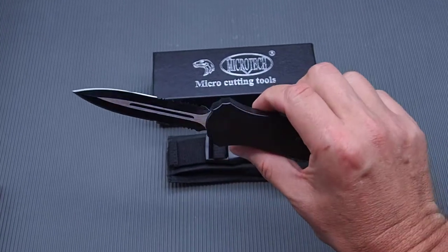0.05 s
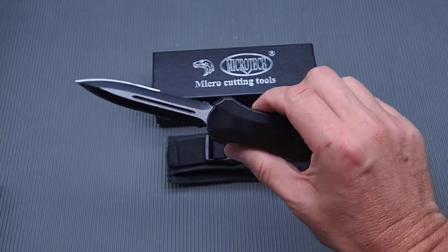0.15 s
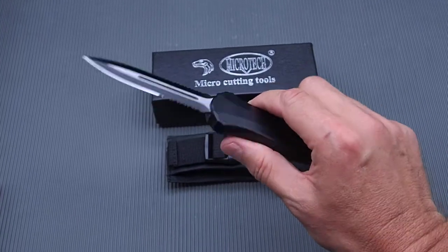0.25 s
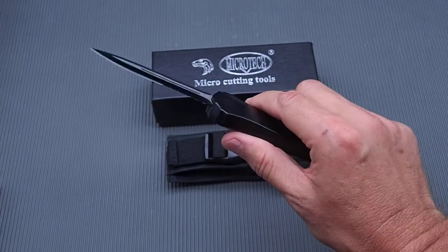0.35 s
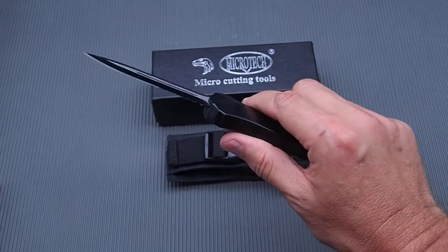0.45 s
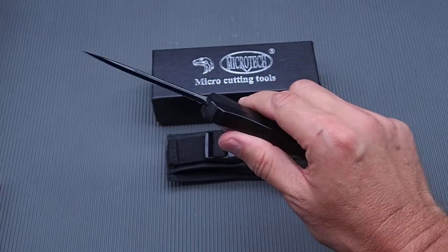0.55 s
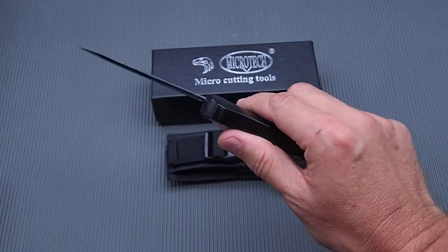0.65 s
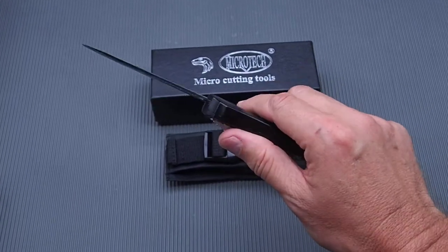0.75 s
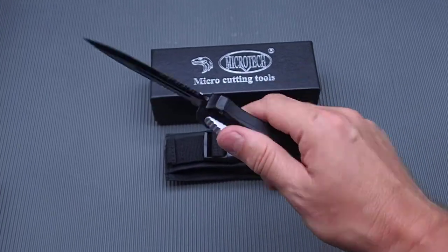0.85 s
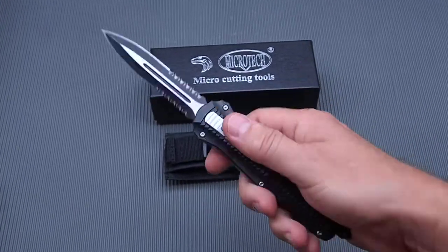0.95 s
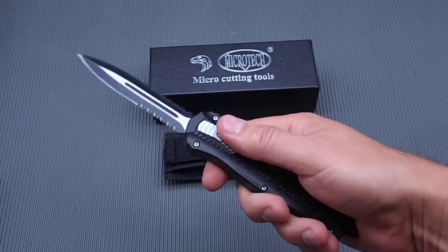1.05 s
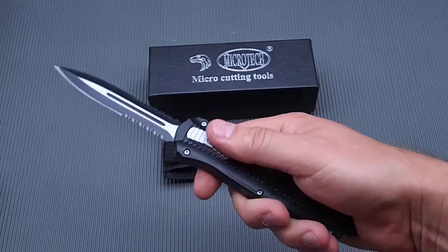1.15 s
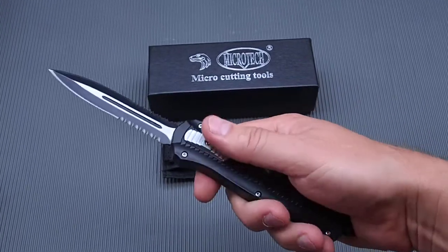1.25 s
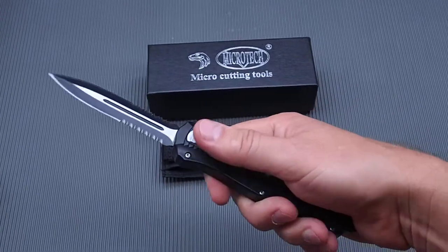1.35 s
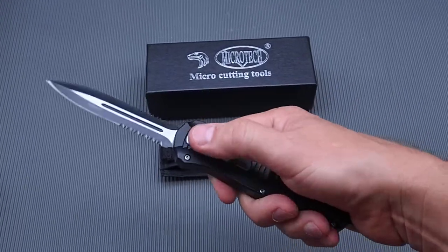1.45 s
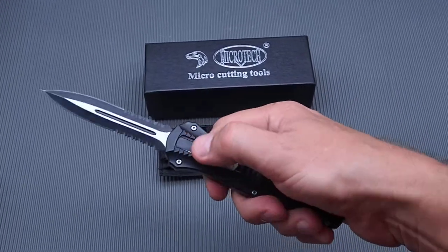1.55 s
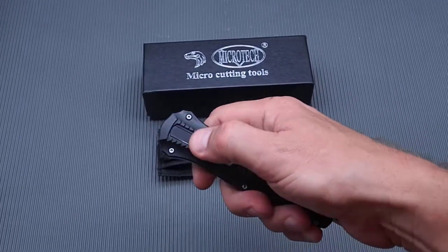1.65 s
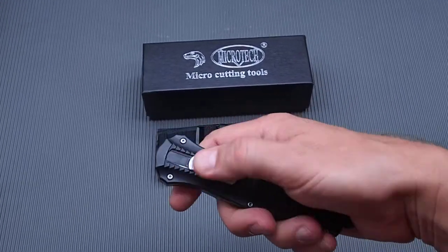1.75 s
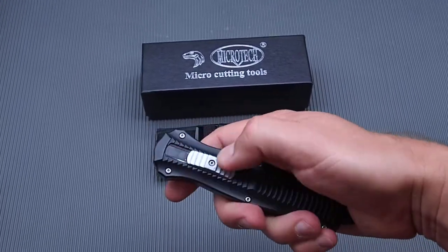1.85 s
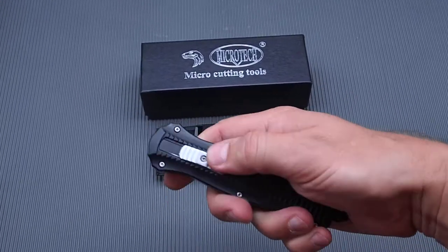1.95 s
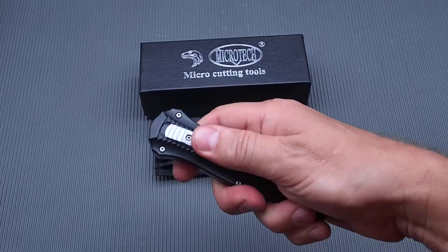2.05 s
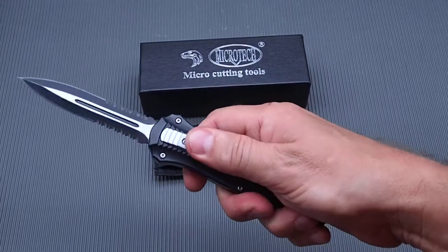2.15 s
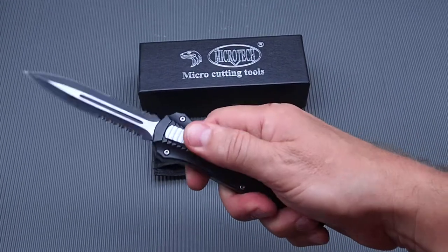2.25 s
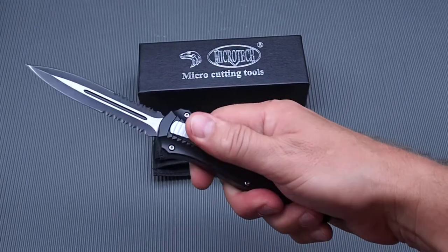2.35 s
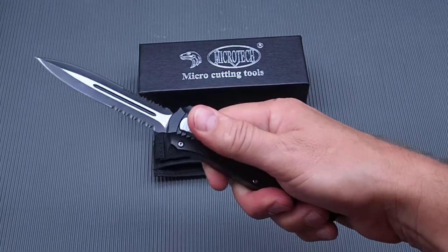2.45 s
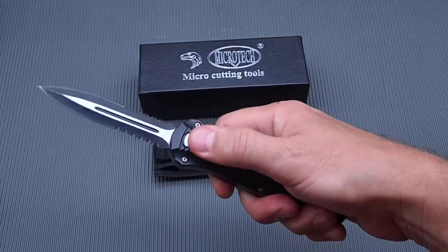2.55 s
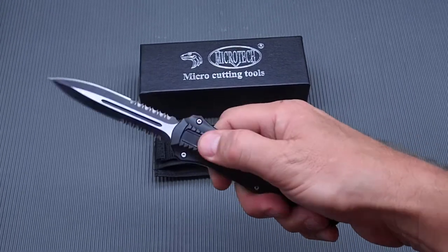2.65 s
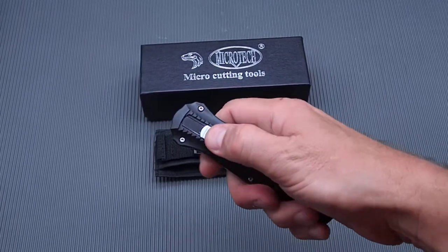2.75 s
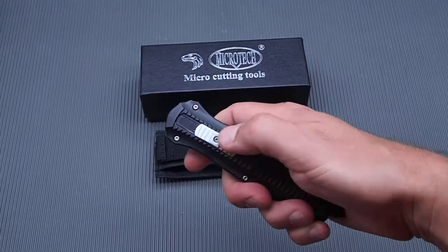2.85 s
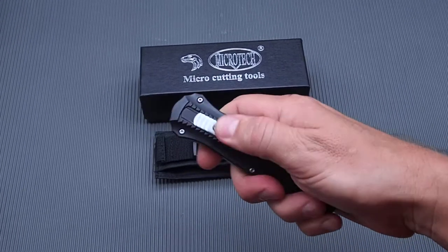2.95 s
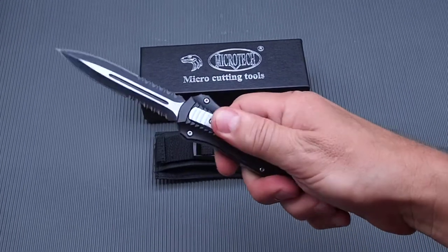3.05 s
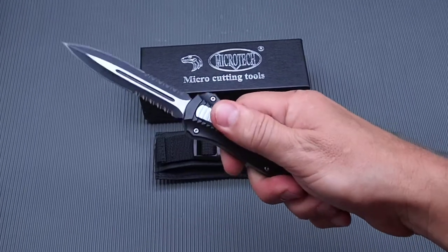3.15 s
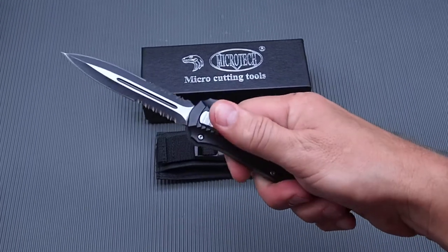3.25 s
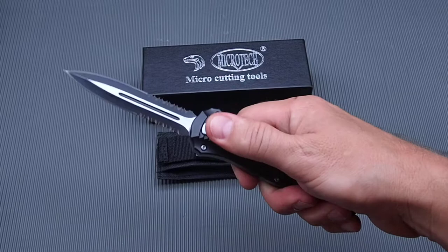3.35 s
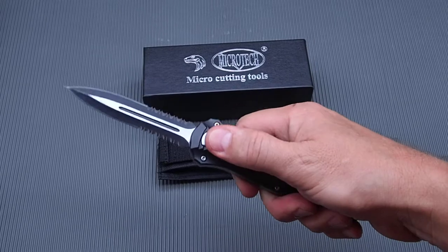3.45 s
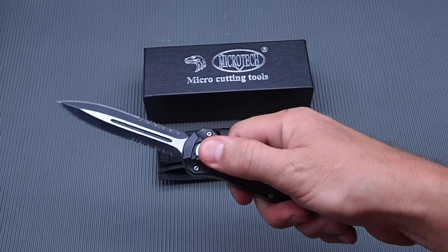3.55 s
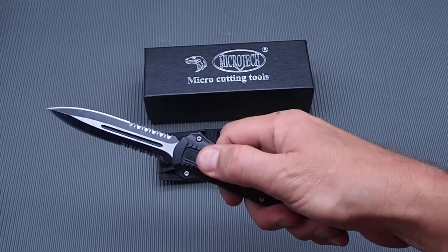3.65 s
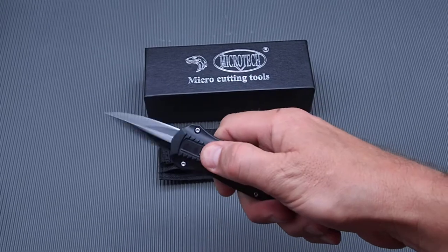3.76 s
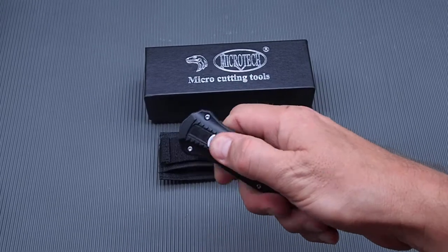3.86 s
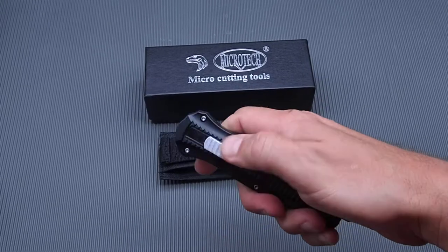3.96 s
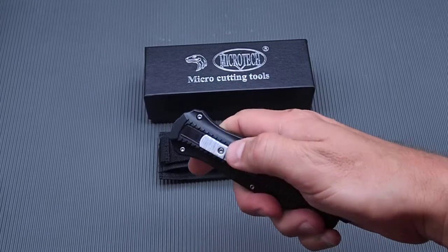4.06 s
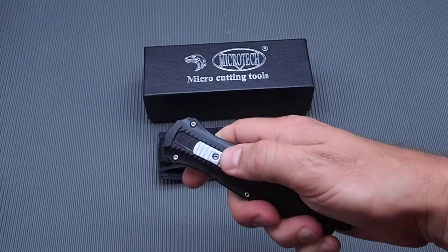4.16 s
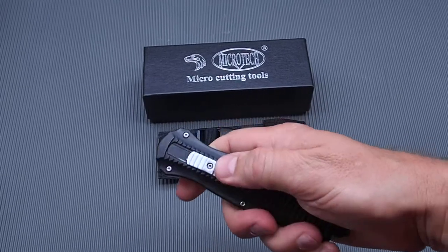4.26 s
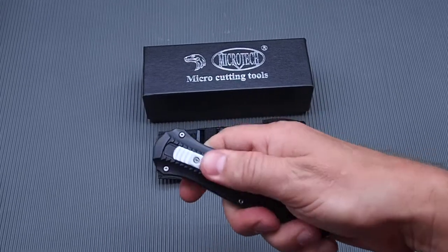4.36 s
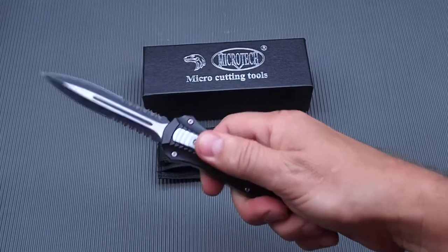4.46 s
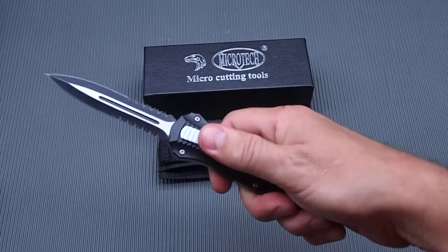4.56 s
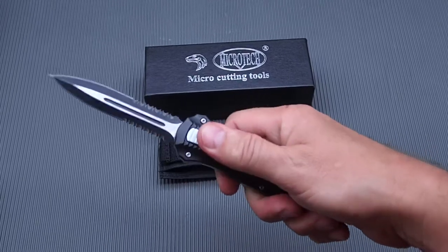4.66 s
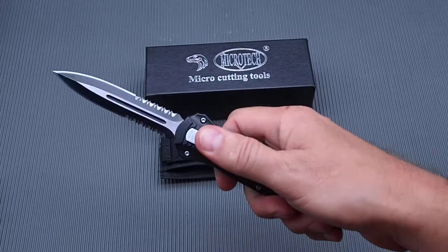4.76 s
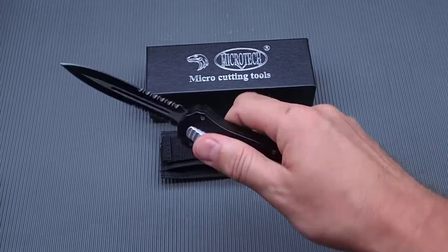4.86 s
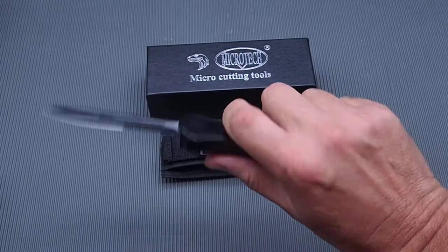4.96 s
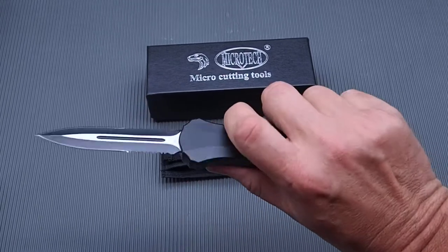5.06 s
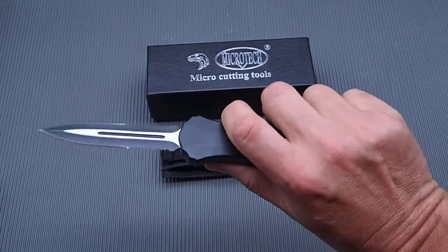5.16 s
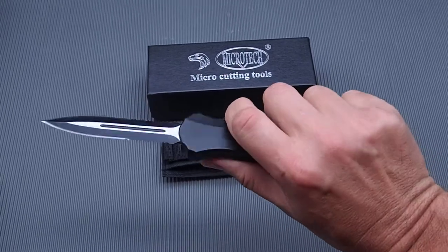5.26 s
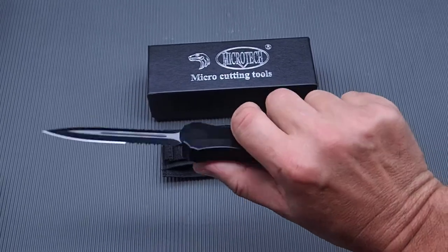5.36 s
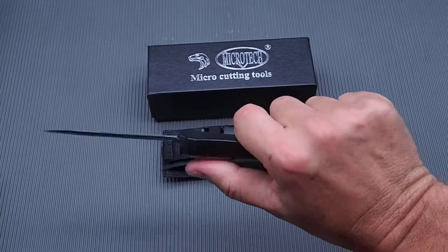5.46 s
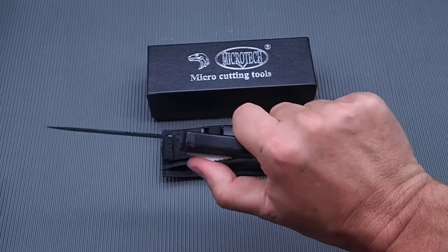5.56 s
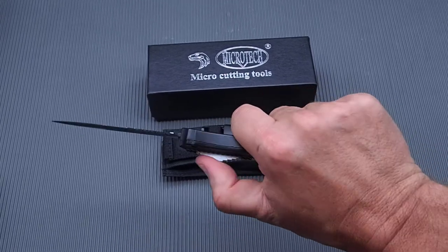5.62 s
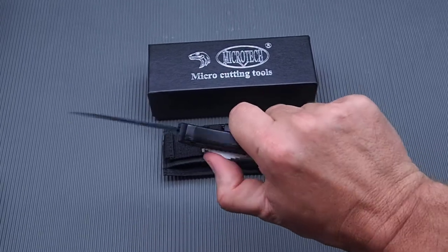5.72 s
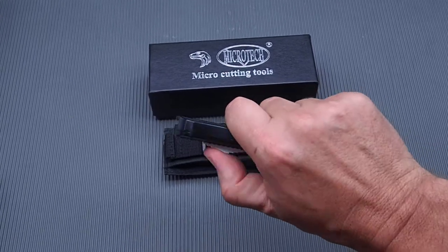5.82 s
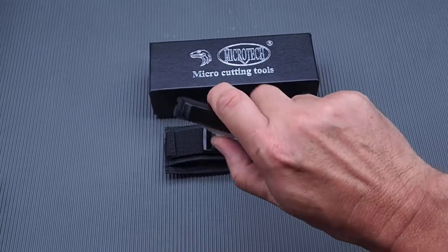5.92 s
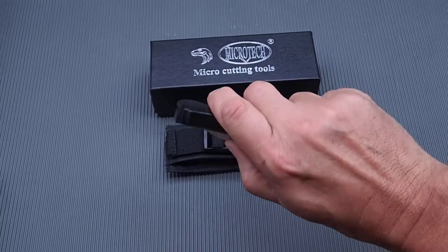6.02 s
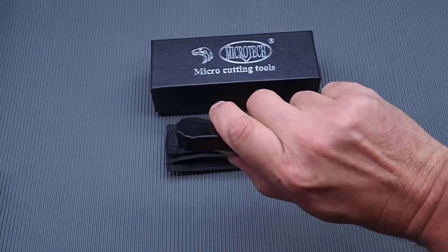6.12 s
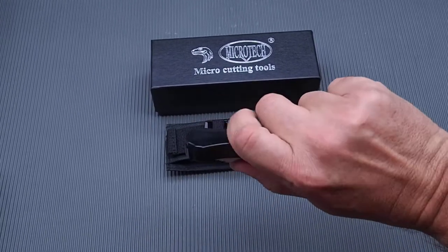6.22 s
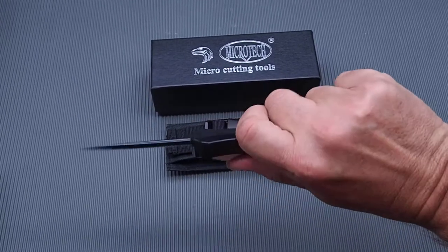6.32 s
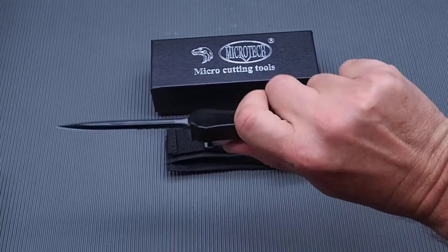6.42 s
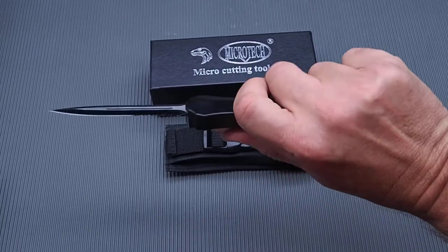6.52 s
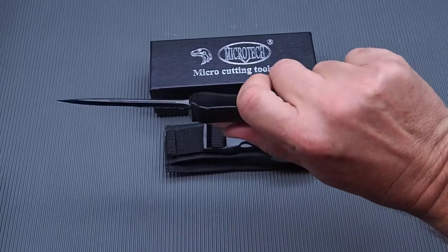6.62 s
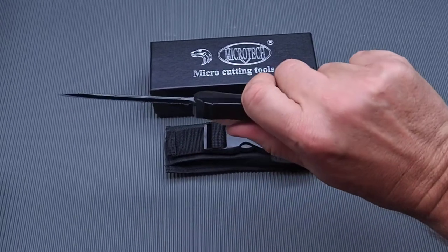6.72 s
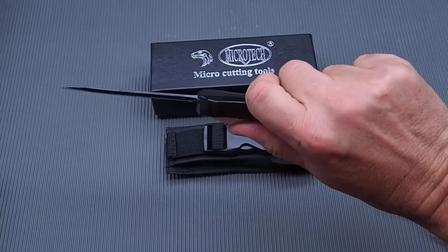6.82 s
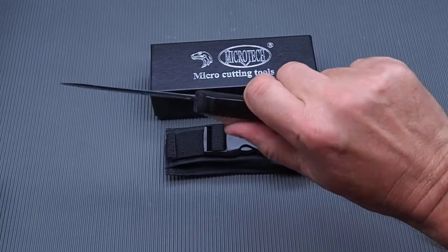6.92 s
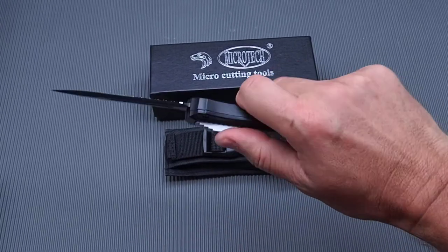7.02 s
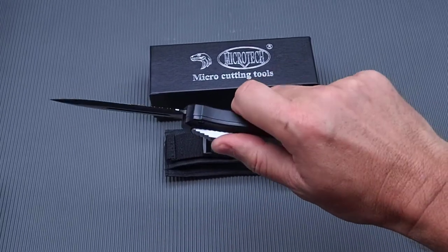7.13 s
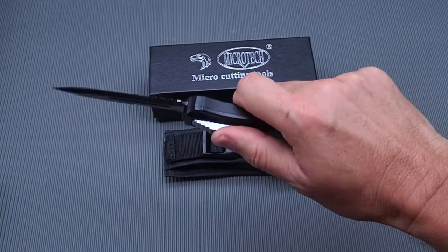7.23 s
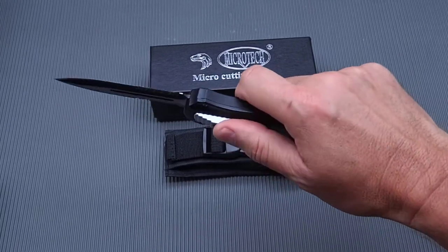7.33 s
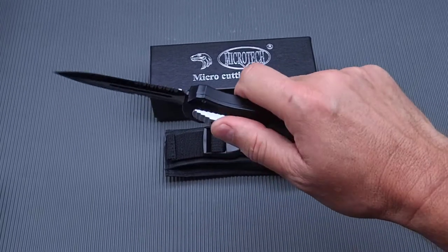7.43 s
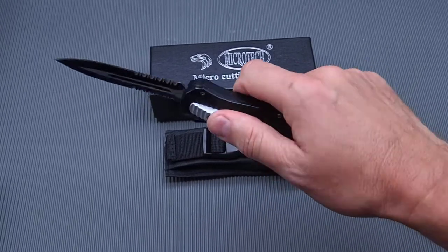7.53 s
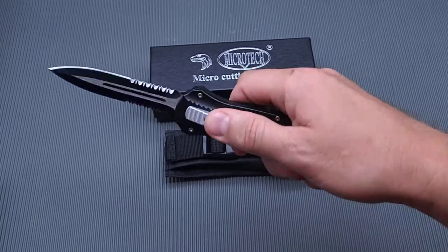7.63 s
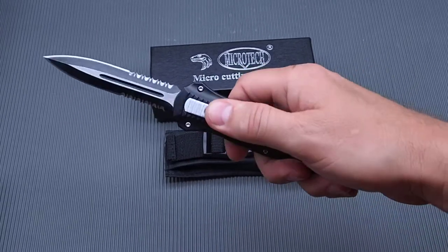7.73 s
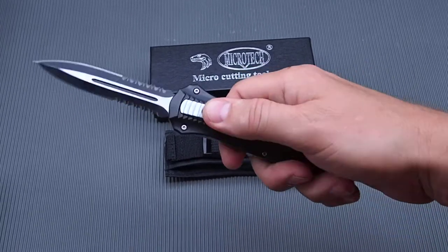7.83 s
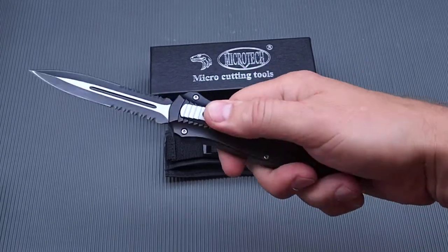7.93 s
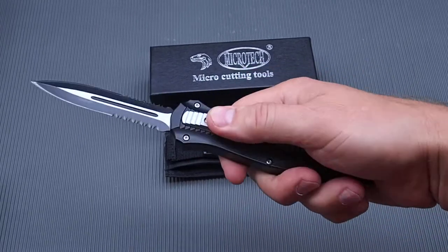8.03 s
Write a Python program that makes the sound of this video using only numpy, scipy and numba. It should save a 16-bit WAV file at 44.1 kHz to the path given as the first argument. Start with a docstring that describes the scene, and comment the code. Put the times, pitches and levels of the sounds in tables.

```python
"""Spring-loaded knife

A spring-loaded knife is snapped shut and fired out again four times, close to a camera in a quiet room.
The thumb slider ticks and scrapes as it loads the spring; the latch lets go, the blade rattles down its track
and slams into its stop 30 ms later. Noise bursts make the contacts; handle filter and steel modes radiate them.
Shaped noise makes the hiss, pulsed sines the camera's whine. The camera's limiter ducks the hiss after every shot."""
import sys
import numpy as np
from scipy import signal
from scipy.fft import rfft, irfft
from scipy.io import wavfile
from scipy.ndimage import uniform_filter1d, minimum_filter1d
from numba import njit

SR = 44100
rng = np.random.default_rng(int(sys.argv[2]) if len(sys.argv) > 2 else 0)


def store_wav(level_fs):
    """Save 16-bit WAV to argv[1]."""
    pcm = np.round(np.clip(np.atleast_2d(level_fs), -1, 1) * 32767)
    wavfile.write(sys.argv[1], SR, pcm.T.astype(np.int16))


N = 356592
T = np.arange(N) / SR

# shots, blade in and out by turns; levels are relative:
# (release time [s], release level [dB], release knock [dB], stop level [dB], stop knock [dB],
#  rattle level [dB], rattle hold [s], slider stroke [s], scrape level [dB], spring creak level [dB])
SHOTS = [(1.5878, -2, 5.5, 4.5, 1.5, -12.5, 0.035, 0.11, -42.5, -26),
         (2.0825, -2, -4, 3.5, -13, -16.5, 0.056, 0.14, -43, -40),
         (2.6776, -11, 4, 1.5, 3, -17.5, 0.048, 0.13, -42, -31),
         (3.0030, -5, 2, 3.5, -4.5, -17.5, .056, 0.064, -33.5, -24),
         (3.7438, -5.5, -0.5, 5.5, -2.5, -19.5, 0.053, 0.17, -45.5, -26),
         (4.4145, -5, 0, 3, -7.5, -18.5, .035, .103, -36.5, -30),
         (5.7232, -5, 1, -0.5, 7.5, -16, 0.05, 0.073, -44.5, -31),
         (6.3063, -4.5, 1.5, 1.5, 4, -19.5, 0.048, .14, -40.5, -37)]
# radiation of the handle and its metal liners: (frequency [Hz], relative level [dB])
HANDLE = [(30, -44), (150, -38), (700, -30.5), (1750, -27), (2200, -26), (2900, -19), (4000, -20),
          (4450, -7.5), (5300, 3), (5900, 0.5), (6500, -3), (8500, -8), (9700, -16), (12000, -21),
          (13200, -13.5), (15800, -23)]


def undb(db):
    """Decibels to gain."""
    return 10 ** (np.asarray(db) / 20)


def unit(x):
    """Scale to an energy of one."""
    return x / np.sqrt(np.sum(x ** 2))


def noise(size=N):
    """White noise."""
    return rng.standard_normal(size)


def fade(t, t60):
    """Exponential decay from t = 0, 60 dB down after t60 seconds."""
    return (t >= 0) * np.exp(-np.log(1000) * np.maximum(t, 0) / t60)


def through(x, response):
    """Pass a sound through an impulse response."""
    return signal.oaconvolve(x, response)[:len(x)]


def colour(points, size=4096):
    """Causal, minimum-phase impulse response of a (Hz, dB) spectrum, by folding the cepstrum."""
    hz, db = np.transpose(points)
    grid_hz = np.maximum(np.fft.rfftfreq(size, 1 / SR), 1)
    gain = undb(np.interp(np.log(grid_hz), np.log(hz), db))
    cepstrum = irfft(np.log(gain))
    cepstrum[1:size // 2] *= 2
    cepstrum[size // 2 + 1:] = 0
    return irfft(np.exp(rfft(cepstrum)))


def band(x, hz, kind, order=2):
    """Butterworth filter."""
    sos = signal.butter(order, hz, kind, fs=SR, output="sos")
    return signal.sosfilt(sos, x + 1e-18)  # the offset avoids denormals


def add(track, s, x):
    """Mix a short sound into a track at time s."""
    i = int(s * SR)
    track[i:i + len(x)] += x[:N - i]


def grit(size, spread_db):
    """Dense tiny contacts of uneven strength, bunched in time; scaled to unit deviation."""
    bunch = uniform_filter1d(noise(size + 40), size=40)[:size]
    x = noise(size) * undb(spread_db * bunch / bunch.std())
    return x / x.std()


def contact(t, chatter_db, chatter_t60, crack_t60, snap):
    """A hard snap and crack, then loose parts chattering to rest."""
    decay = fade(t, crack_t60)
    crack = unit(noise(len(t)) * decay)
    impulse = snap * (t == 0)
    crack = unit(crack + impulse) * np.sqrt(np.sum(decay ** 2))
    chatter = grit(len(t), spread_db=3.5) * fade(t, chatter_t60)
    return crack + undb(chatter_db) * chatter


def ring(modes):
    """Impulse response of steel modes in random phase; so small a part radiates no bass."""
    t = T[:SR // 3]
    swing = np.zeros(len(t))
    for hz, db, t60 in modes:
        swing += undb(db) * fade(t, t60) * np.sin(2 * np.pi * (hz * t + rng.random()))
    return unit(band(swing, .88 * modes[0][0], "high", order=5))


def brighten(x, treble_db):
    """Scale the treble: a harder contact carries more of the top octave."""
    lows = band(x, 13600, "low")
    lows = band(lows[::-1], 8700, "low")[::-1]  # run backwards to offset the delay
    return x + (undb(treble_db) - 1) * (x - lows)


def hiss(points, db):
    """Steady room and microphone hiss: noise shaped by a spectrum."""
    return undb(db) * through(noise(), unit(colour(points)))


def whine(hz, width_hz, pulse_hz, pulse_periods):
    """A thin wavering tone of the camera: decaying pulses in spells, with a weak partial an octave below."""
    # spells of whine: (start [s], end [s])
    spells = [(0, 1.03), (4.2, 4.85), (5.2, 8.09)]
    waver, flutter = band(noise((2, N)), width_hz, "low")
    pulses = np.exp(-(T * pulse_hz % 1) / pulse_periods)
    on = sum((T >= start) & (T < end) for start, end in spells)
    pulses = band(on * pulses / pulses.std() / 2, 92, "low")
    pulses = pulses * undb(3.3 * flutter / flutter.std())
    phase = 2 * np.pi * hz * T + waver / waver.std()
    tone = np.sin(phase) + undb(-22.0) * np.sin(phase / 2)
    return undb(-61.5) * pulses * tone


def slider():
    """The slider takes up its play with ticks, then scrapes along while the spring stretches and creaks."""
    # ticks of slider and latch: (time [s], relative level [dB], treble [dB], latch ring [dB])
    ticks = [(0.8674, -39, -6, 3), (1.453, -14, -26, 15), (1.4868, -13, -14, -2.5),
             (1.851, -26.5, 2.5, -18), (1.9186, -27.5, -19, -3), (1.9712, -22, -4, 0), (2.0144, -10, -8, 0),
             (2.6462, -24.5, 1, -13), (2.9225, -22, -15, -4), (2.9506, -22, 7, -8), (2.972, -6, -7, -6),
             (4.266, -18.5, -1, -26), (4.3658, -16, -13, -26), (5.5496, -27, -20, -10),
             (5.5634, -22.5, -22, -3), (5.6611, -17.5, -21, 0), (6.0516, -16.5, -18, -26),
             (6.2433, -15, -23, -4), (7.1714, -40, -6, -10), (7.421, -28.5, -15, -9)]
    # bright rasps as the slider starts forward: (time [s], length [s], level [dB])
    rasps = [(1.96, 0.047, -42.5), (2.942, .02, -34), (4.315, .04, -48), (6.16, 0.051, -48.5)]
    # modes of the latch: (frequency [Hz], relative level [dB], t60 [s])
    latch_modes = [(5250, -2, .018), (5550, 0, .018), (5850, -3, .016)]
    scrape_db_per_s, creak_db_per_s = 111.5, 332.5  # both swell as the spring stretches
    surge_db, surge_s = 4, 0.018  # the scrape hardens as the latch is pried up
    (force, latch, creak), t = np.zeros((3, N)), T[:SR // 10]

    for s, db, treble_db, ring_db in ticks:
        tick = undb(db - 13.0) * contact(t, chatter_db=-7, chatter_t60=0.094, crack_t60=0.056, snap=0.2)
        share = undb(ring_db) / np.hypot(1, undb(ring_db))  # part of the blow that rings the latch
        add(force, s, np.sqrt(1 - share ** 2) * brighten(tick, treble_db))
        add(creak, s, undb(-8.5) * tick)  # the spring picks up some
        add(latch, s, share * (tick + undb(db + 4.5) * (t == 0)))

    for release_s, *_, stroke_s, scrape_db, creak_db in SHOTS:
        start_s, to_go_s = release_s - stroke_s, np.arange(stroke_s, 0, -1 / SR)
        swell_db = surge_db * np.exp(-to_go_s / surge_s) - scrape_db_per_s * to_go_s
        scrape = undb(scrape_db + swell_db) * grit(len(to_go_s), spread_db=4.0)
        add(force, start_s, brighten(scrape, treble_db=-11))
        add(latch, start_s, undb(-5.5) * scrape)
        creak_gain = undb(creak_db - creak_db_per_s * to_go_s)
        add(creak, start_s, creak_gain * grit(len(to_go_s), spread_db=3.5))

    for s, length_s, db in rasps:
        arch = np.sin(np.pi * np.arange(0, length_s, 1 / SR) / length_s)
        rasp = undb(db) * arch * grit(len(arch), spread_db=5.5)
        add(force, s, brighten(rasp, treble_db=12.5))

    handle = through(band(force, 2700, "high"), unit(colour(HANDLE)))
    return handle + through(latch, ring(latch_modes)) + band(creak, [2050, 2400], "band")


def shots(ring_db):
    """The blade leaves its latch, rattles along the track and hits the far stop; handle and steel radiate."""
    # modes with the blade in and out, damped by the hand: (frequency [Hz], relative level [dB], t60 [s])
    blade_in = [(2032, -16, .03), (2189, -12, .03), (2480, -14, .02), (4638, -5, .04), (5083, 0, .04),
                (5380, 0, .035), (5560, 3, .035), (7230, -1, .018), (9070, -14, .035), (10780, -45, .32),
                (13200, -12, .025), (15300, -14, .028)]
    blade_out = [(2300, -17, .025), (2850, -15, .025), (4520, -5, .025), (5050, -1, .025), (5230, 1, .04),
                 (5390, -1, .035), (5850, 4, .03), (6750, 0, .025), (9090, -17, .05), (13130, -17, .11),
                 (14450, -15, .02)]
    flight_s = .0297  # from latch to stop
    slip_s = .0045  # the blade starts to move just before the latch snaps
    rebound_s, latch_rebound_s = .0055, .0068  # each blow bounces once
    latch_rebound_db, rebound_knock_db = -5, -18.5
    rattle_knock_db = -3.5  # the rattle shakes the handle's body less
    drive_db = 13.5
    out, t = np.zeros(N), T[:SR // 10]
    shell = unit(colour(HANDLE))

    def radiate(s, force, knock_db, modes):
        """Every contact lands elsewhere, knocks the handle and rings the steel anew."""
        force = force + (undb(knock_db) - 1) * band(force, 2700, "low", order=1)
        add(out, s, signal.fftconvolve(force, shell))
        add(out, s, undb(ring_db) * signal.fftconvolve(force, ring(modes)))

    def blow(db, chatter_db, snap):
        """A hard contact of steel on steel."""
        return undb(db) * contact(t, chatter_db, chatter_t60=0.054, crack_t60=0.0098, snap=snap)

    for k, shot in enumerate(SHOTS):
        s, release_db, release_knock_db, stop_db, stop_knock_db, rattle_db, rattle_s, *_ = shot
        if k % 2 == 0:  # pulled in
            modes, rebound_db, snap = blade_in, -5, 0.55
        else:  # pushed out
            modes, rebound_db, snap = blade_out, -0.52, 0.38
        slide = np.minimum(t / 0.008, 1) * fade(t - np.minimum(t, rattle_s), 0.034)
        rattle = undb(rattle_db) * slide * grit(len(t), spread_db=2.5)
        radiate(s - slip_s, rattle, rattle_knock_db, modes)

        release = blow(release_db, chatter_db=-5.0, snap=snap)
        radiate(s, release, release_knock_db, modes)
        latch_rebound = blow(release_db + latch_rebound_db, chatter_db=-7, snap=snap)
        radiate(s + latch_rebound_s, latch_rebound, rebound_knock_db, modes)

        stop_s = s + flight_s
        radiate(stop_s, blow(stop_db, chatter_db=-8, snap=0.24), stop_knock_db, modes)
        rebound = blow(stop_db + rebound_db, chatter_db=-9, snap=1.0)
        radiate(stop_s + rebound_s, rebound, rebound_knock_db, modes)
    return undb(drive_db) * out


def bumps():
    """The hand knocks softly against the handle: a dull thud with a little skin noise."""
    # knocks: (time [s], relative level [dB])
    knocks = [(5.551, -39), (5.563, -40)]
    out, t = np.zeros(N), T[:SR // 10]
    for s, db in knocks:
        skin = band(band(noise(len(t)), 640, "low"), 90, "high") * fade(t, 0.061)
        thud = np.sin(2 * np.pi * 100 * t) * fade(t, 0.046)
        add(out, s, undb(db) * (1.1 * thud + 2.9 * skin))
    return out


def room(x, near_db, near_t60, far_db, far_t60):
    """Quick reflections from the table and things on it, then the short tail of the walls: decaying noise."""
    t = T[:SR // 2]
    near = unit(noise(len(t)) * fade(t - .002, near_t60))
    far = unit(noise(len(t)) * fade(t - .012, far_t60))
    return through(x, undb(near_db) * near + undb(far_db) * band(far, 11200, "low"))


def ports(x, size=40):
    """Side signal: two microphones hear each frequency equally loud, now one and now the other leading."""
    # how unlike the microphones hear the knife: (frequency [Hz], side relative to mid [dB])
    side_level = [(300, -11), (1500, -42), (2200, -49), (3900, -40), (4600, -6), (8000, -4), (12000, 2.5),
                  (16000, -6)]
    lead = np.tanh(2 * rfft(unit(noise(size)), N).real)
    hz, db = np.transpose(side_level)
    width = undb(np.interp(np.fft.rfftfreq(N, 1 / SR), hz, db))
    return irfft(rfft(x) * 1j * lead * width, N)  # a quarter turn from mid


def spread(x):
    """The contacts jump about along the knife, so the lag between the microphones keeps changing."""
    place = band(noise(), 150, "low")
    angle = .9 * place / place.std()
    return np.cos(angle) * ports(x) + np.sin(angle) * ports(x)


def scene():
    """Knife, room, hiss and whine as mid and side, then left and right."""
    # hiss spectra, common and unlike part: (frequency [Hz], relative density [dB])
    hiss_mid = [(22, -12), (50, -4), (250, 0), (1000, -2.5), (1650, -6.5), (2200, -12), (2700, -19),
                (3150, -11), (3700, -22), (4300, -21.5), (5200, -6.5), (6900, -8.5), (7900, -4.5),
                (9600, -12.5), (16000, -14)]
    hiss_side = [(25, -17), (80, -11), (250, -5), (1000, -6.5), (1650, -10.5), (2200, -17), (3900, -30.5),
                 (5200, -11.5), (6900, -9.5), (7900, -9), (9600, -16), (16000, -18)]
    left_db = 2.0  # left over right
    knife = slider() + shots(ring_db=-6.5)
    wet = [room(knife, near_db=-13.0, near_t60=0.085, far_db=-37, far_t60=0.25) for _ in range(2)]
    motor = [whine(hz=6150, width_hz=12, pulse_hz=29.8, pulse_periods=0.52) for _ in range(2)]
    side = spread(knife) + band(wet[1], 6200, "high", order=4)
    side = side + hiss(hiss_side, -53.5) + undb(10) * motor[1]
    mid = knife + wet[0] + bumps() + hiss(hiss_mid, -53.5) + motor[0]
    return np.array([(mid + side) * undb(left_db / 2), (mid - side) * undb(-left_db / 2)])


@njit
def limiter(peak, top, attack_s, hold_s, release_s):
    """Gain that drops fast under a peak, holds while loud and briefly after, then creeps back."""
    gain, g, wait = np.empty(len(peak)), 1., 0.
    for i in range(len(peak)):
        if peak[i] * g > top:
            g += (top / peak[i] - g) / (1 + attack_s * SR)
        if peak[i] * g > .4 * top:
            wait = hold_s * SR
        wait -= 1
        if wait < 0:
            g += (1 - g) / (release_s * SR)
        gain[i] = g
    return gain


def record(dry):
    """Microphone dips, a look-ahead limiter on the short-term rms, full-scale clipping and the top cut."""
    # narrow dips in the microphone's response: (frequency [Hz], width [Hz])
    notches = [(1875, 135), (3420, 125), (4810, 140)]
    for hz, width_hz in notches:
        dry = signal.lfilter(*signal.iirnotch(hz, hz / width_hz, SR), dry)
    power = uniform_filter1d((dry ** 2).mean(axis=0), size=66)
    loudness = np.sqrt(np.maximum(power, 0))
    ahead = -minimum_filter1d(-loudness, size=130)  # running maximum
    gain = limiter(ahead, .34, .0005, .025, .16)  # top as rms, then times in s
    clipped = np.clip(dry * gain, -1, 1)
    top_cut = signal.ellip(10, .2, 70, 15850, fs=SR, output="sos")
    return signal.sosfilt(top_cut, clipped)


dry = scene()
out = record(dry)
store_wav(out)
```